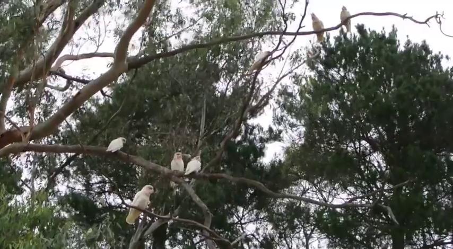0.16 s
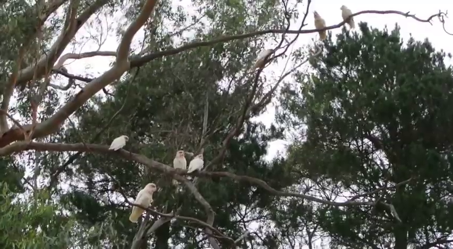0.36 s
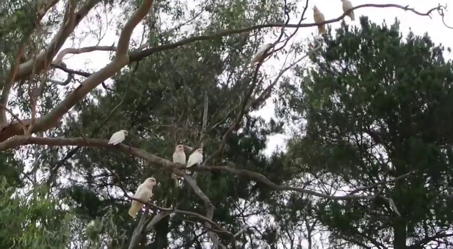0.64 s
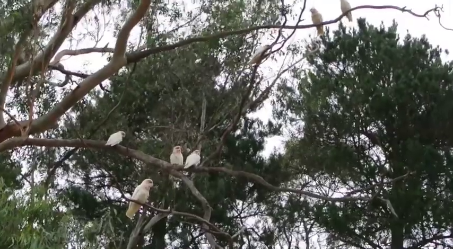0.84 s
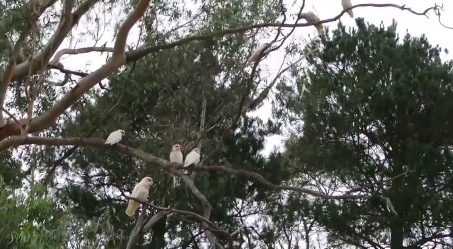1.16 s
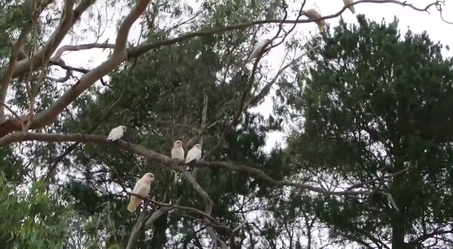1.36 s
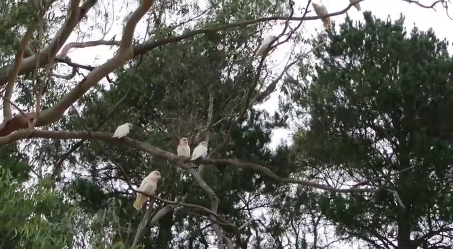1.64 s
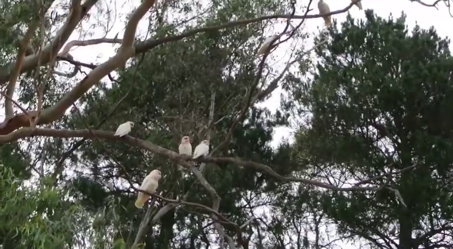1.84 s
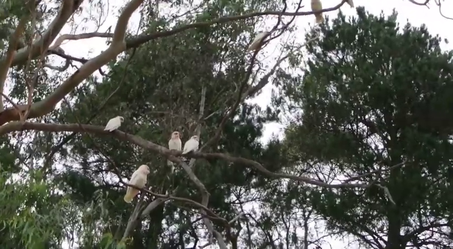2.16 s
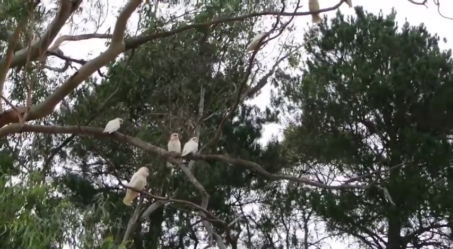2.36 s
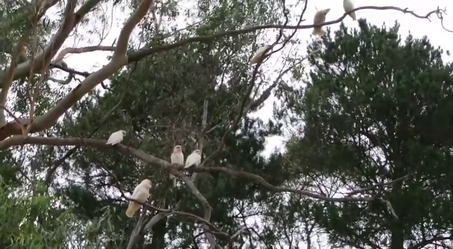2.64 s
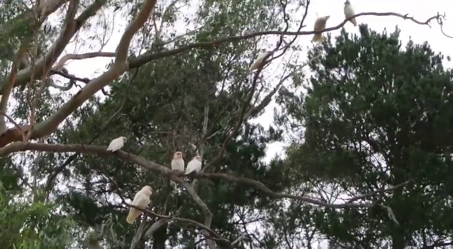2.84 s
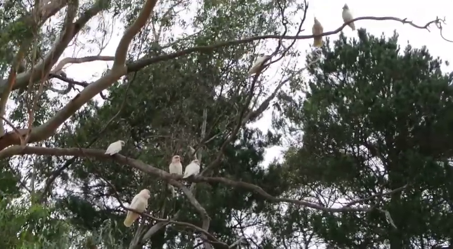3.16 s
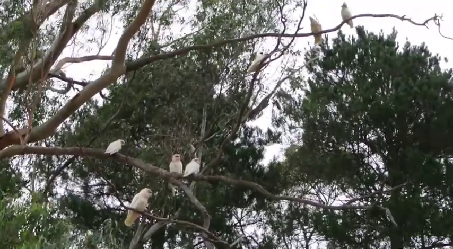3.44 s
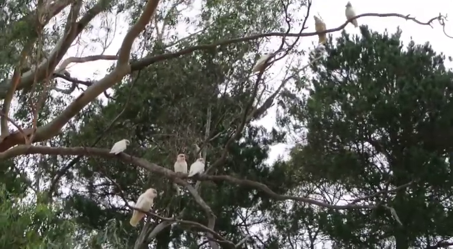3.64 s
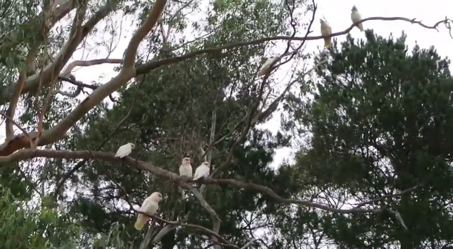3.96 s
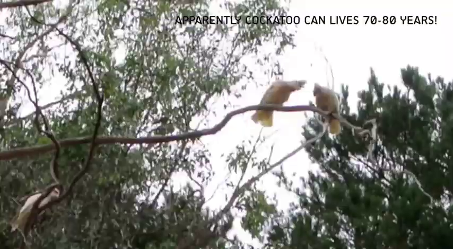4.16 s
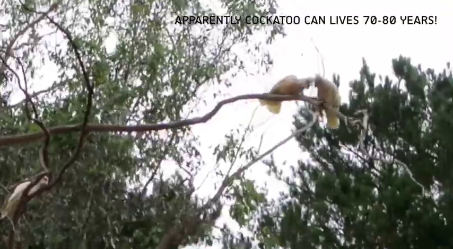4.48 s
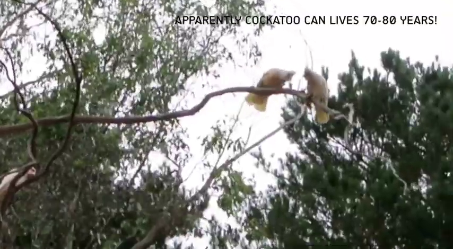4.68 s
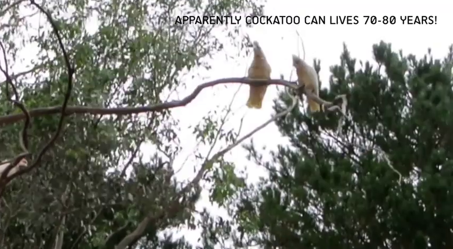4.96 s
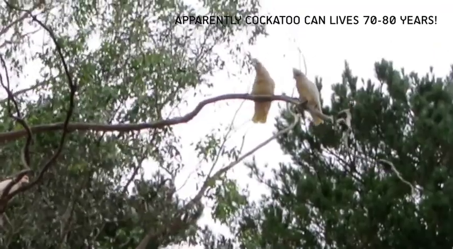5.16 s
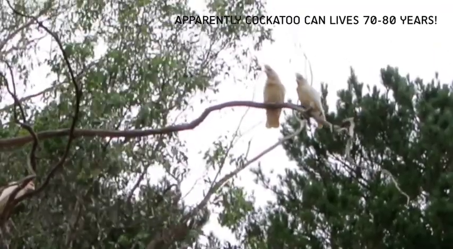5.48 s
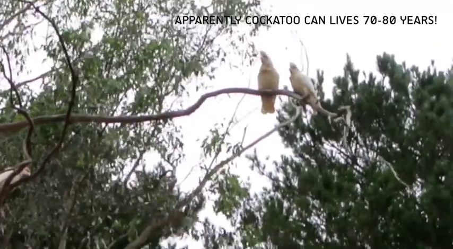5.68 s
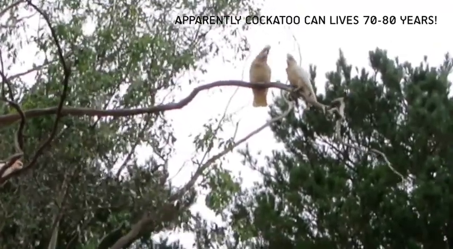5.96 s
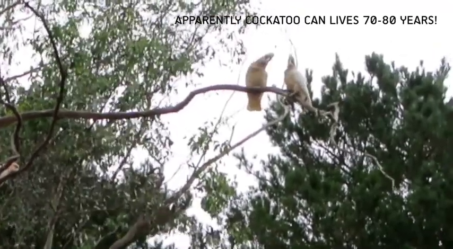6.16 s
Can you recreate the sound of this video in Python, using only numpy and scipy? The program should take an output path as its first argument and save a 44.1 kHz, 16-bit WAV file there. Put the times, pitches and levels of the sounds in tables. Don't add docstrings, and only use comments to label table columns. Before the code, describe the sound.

Distant cockatoos chatter in short yelps under buffeting wind, then abruptly nearby birds yelp and screech loudly and harshly among trees.

```python
import sys
import numpy as np
from scipy import signal
from scipy.fft import rfft, irfft
from scipy.io import wavfile
from scipy.ndimage import map_coordinates

SR = 44100
rng = np.random.default_rng(int(sys.argv[2]) if len(sys.argv) > 2 else 0)


def bounce(signal):
    frames = np.transpose(np.atleast_2d(signal))
    limited = np.clip(frames, -1, 1)
    pcm = np.round(limited * 32767).astype(np.int16)
    wavfile.write(sys.argv[1], SR, pcm)


def ratio(d):
    e = np.asarray(d, float) / 20
    return 10 ** e


N = 278712
TIME_S = np.arange(N) / SR


def rms_one(x):
    return x / np.sqrt(np.mean(x ** 2) + 1e-20)


def in_time(rows):
    times, *columns = np.transpose(rows)
    return [np.interp(TIME_S, times, column) for column in columns]


def at_hz(points, hz):
    point_hz, point_db = np.transpose(points)
    return np.interp(np.log(hz), np.log(point_hz), point_db)


def drift(rate_hz, size):
    r = np.exp(-2 * np.pi * rate_hz / SR)
    settling = 9000
    noise = rng.standard_normal(size + settling)
    return rms_one(signal.lfilter([1], [1, -2 * r, r * r], noise)[settling:])


def coloured(points):
    hz = np.maximum(np.arange(N // 2 + 1) * SR / N, 1)
    spectrum = rfft(rng.standard_normal((2, N))) * ratio(at_hz(points, hz))
    return rms_one(irfft(spectrum, N))


def resonance(x, hz, width_hz):
    r = np.exp(-np.pi * width_hz / SR)
    zeros = np.array([1, 0, -1]) * (1 - r * r) / 2
    return signal.lfilter(zeros, [1, -2 * r * np.cos(2 * np.pi * hz / SR), r * r], x)


# mode_hz, width_hz, level_db
THROAT_MODES = [(666, 220, -20), (1250, 750, -13.5), (2350, 510, -0.5)]
GAPE_MODES = [(3400, 700, 2.5), (5050, 830, -3.5)]
EDGE_MODES = [(6080, 1560, -0.5), (8740, 2340, -1.5), (11300, 3500, -4)]
ACCENTS_PER_S, ACCENT_DB = 210, 9


def ring(source, modes):
    total = 0
    for k, (hz, width_hz, level_db) in enumerate(modes):
        total = total + ratio(level_db) / np.sqrt(width_hz) * (-1) ** k * resonance(source, hz, width_hz)
    return rms_one(total)


def rasp(level_db, bright_db, gape_db, pulse_hz, jitter, spread_db, breath):
    phase = np.cumsum(pulse_hz * (1 + jitter * drift(500, size=N))) / SR
    fires = np.diff(np.floor(phase), prepend=0)
    even_power = np.sqrt(SR / pulse_hz)
    sizes = ratio(spread_db * rng.standard_normal(N).clip(-2, 2.4)) * even_power

    group = np.floor(np.cumsum((fires > 0) * ACCENTS_PER_S / pulse_hz) + .25 * drift(60, size=N))
    fire_at = np.flatnonzero(fires)
    accent = np.zeros(N, bool)
    accent[fire_at[1:][np.diff(group[fire_at]) > 0]] = True
    sizes = np.where(accent & (pulse_hz > 900), ratio(ACCENT_DB) * even_power, sizes)

    late = np.clip((phase % 1) * SR / pulse_hz, 0, 1)
    fired = fires * sizes
    pulses = fired * (1 - late) + np.roll(fired * late, -1)

    puffs = 1 + 0.76 * np.cos(2 * np.pi * phase)
    source = pulses + breath * puffs * rng.standard_normal(N)
    source = source / np.sqrt(1 + 0.78 * breath ** 2)
    low, high, edge = [ring(source, modes) for modes in (THROAT_MODES, GAPE_MODES, EDGE_MODES)]
    share = np.clip(ratio(gape_db + 1.5), 0, .95)
    voice = np.sqrt(1 - share ** 2) * low - share * high
    return ratio(level_db) * (voice + ratio(bright_db) * edge)


DULLING = 0.58


def outbursts(rows, attack_s, release_db_per_s):
    start, length, level_db, fade_db, bright_db = np.transpose(rows)[:, :, None]
    since = TIME_S - start
    release_db = release_db_per_s * np.maximum(since - length, 0)
    slack_db = release_db - 8.1 * np.log10(np.clip(since / attack_s, 1e-6, 1))
    db = level_db - fade_db * np.clip(since / length, 0, 1) - slack_db
    loudest = np.argmax(db, axis=0)
    slack_db = np.minimum(slack_db[loudest, np.arange(N)], 40)
    return db.max(axis=0), bright_db[loudest, 0] - DULLING * slack_db


# start_s, length_s, level_db, fade_over_length_db, brightness_db
NEAR_SCREECHES = [(3.8, 0.19, -17.5, 12, -8), (3.925, .25, -15, 5.5, -6.5), (4.2, 0.04, -25, 1, -7.5),
                  (4.315, .2, -18, 0, -6.5), (4.675, 0.044, -27, -2.5, -9), (4.81, 0.21, -36, -4, -21),
                  (5.18, 0.09, -21.5, -2, -7), (5.23, .09, -28, -4, -4), (5.285, .335, -23, 1, -6.5),
                  (5.71, 0.33, -21.5, -1.5, -13.5), (6.19, 0.079, -44, 0, 3)]
# time_s, rate_hz, chaos (0-1.1)
THROAT_PULSING = [(3.81, 1200, .45), (3.88, 1050, .7), (3.95, 1080, .6), (4.09, 1200, 1.05),
                  (4.19, 1190, 1.0), (4.25, 1000, .8), (4.33, 1120, .7), (4.43, 1200, 1.1),
                  (4.51, 1200, 1.1), (4.6, 980, 1.0), (4.7, 1080, .9), (5.18, 1050, .9), (5.19, 686, .9),
                  (5.27, 686, .9), (5.29, 343, .2), (5.325, 343, .3), (5.34, 686, .8), (5.7, 686, .9),
                  (5.76, 660, .65), (6.32, 800, .8)]


def near_screeches():
    level_db, bright_db = outbursts(NEAR_SCREECHES, attack_s=0.055, release_db_per_s=240)
    pulse_hz, chaos = in_time(THROAT_PULSING)
    gape_db = -3.5 + 0.17 * (level_db + 20)
    return rasp(level_db - 1.5, bright_db, gape_db, pulse_hz, jitter=.07 * chaos, spread_db=3.5,
                breath=1.5 * chaos)


# start_s, length_s, level_db, fade_over_length_db, brightness_db
FLOCK_OUTBURSTS = [(-.03, 0.34, -55, -5.5, -6.5), (.45, 0.13, -63, -16, -8), (.72, 0.25, -48.5, 1.5, -12),
                   (1.06, 0.22, -44, 4.5, -11), (1.385, 0.17, -43.5, -7.5, -7.5), (1.75, 0.18, -65, 3, -16),
                   (2.0, 0.64, -60, -20.5, -13), (2.65, 0.11, -40, 5, -34), (3.1, .2, -74, 0, -15),
                   (3.357, 0.048, -49, 8, 19.5), (3.43, 0.1, -47, -16, 3.5)]


def far_flock_rasp():
    level_db, bright_db = outbursts(FLOCK_OUTBURSTS, attack_s=0.028, release_db_per_s=201)
    return rasp(level_db, bright_db, gape_db=-4.5, pulse_hz=797.0, jitter=0.21, spread_db=3.0, breath=2.9)


# time_s, pitch_hz, level_db
LOW_SIDE = [
    [(3.93, 2286, -30), (4.0, 2294, -28), (4.06, 2450, -36), (4.15, 2514, -32), (4.2, 2346, -36),
     (4.235, 1802, -38), (4.26, 1704, -46)],
    [(4.32, 2205, -38.5), (4.37, 2280, -25.5), (4.41, 2498, -35), (4.46, 2400, -37), (4.51, 2506, -30),
     (4.57, 2237, -31.5), (4.62, 1700, -49)],
    [(5.2, 2347, -34), (5.222, 2340, -26), (5.4, 2430, -35.5), (5.572, 2384, -29.5), (5.58, 2330, -42),
     (5.62, 2327, -32)],
    [(5.77, 2750, -50), (5.774, 2679, -41), (5.796, 2562, -32), (5.828, 2657, -33.5), (6.028, 2613, -37),
     (6.06, 2535, -33)],
]
# time_s, pitch_hz, level_db
HIGH_SIDE = [
    [(3.93, 3150, -27), (3.97, 3350, -27), (4.05, 3250, -28), (4.12, 3350, -35), (4.22, 3150, -38),
     (4.26, 3100, -50)],
    [(4.32, 3250, -36), (4.36, 3280, -25.5), (4.44, 3450, -31), (4.52, 3420, -33.5), (4.56, 3350, -50),
     (4.62, 3300, -55)],
    [(5.2, 3495, -47), (5.216, 3370, -32), (5.282, 3424, -26.5), (5.536, 3416, -33), (5.572, 3371, -24),
     (5.62, 3423, -50)],
    [(5.77, 3230, -48), (5.792, 3207, -31), (5.82, 3279, -32), (5.828, 3333, -30), (5.954, 3291, -30),
     (6.06, 3299, -41)],
]
MIX_LINES = [
    [(.5, 0), (2, 0), (-1, 2), (1, 1), (2, -1)],
    [(.5, 0), (2, 0), (-1, 2), (1, 1), (2, -1), (1.5, 0)],
    [(2, -1), (-1, 2), (1, 1), (4, -1), (-1, 1), (3, -1), (-3, 3), (-2, 2), (2, 0), (5, -2)],
    [(-2, 2), (-1, 2), (1, 1), (2, -1), (-2, 3), (2, 0), (0, 1.5), (0, 2)],
]
MIX_LEVELS = [
    [-17.5, -25, -8, -21, -10.5],
    [-11, -6.5, -21, -17, -21, -23],
    [-18, -8, -12, -7.5, -24, -3.5, -10, -14, -13, -22],
    [-8, -8, -13, -15, -11, -20, -5, -9.5],
]
SIDE_WOBBLE = [.012, .008, .004, .004]


def two_voices(flutter_db=3.0):
    out = np.zeros(N)
    for low, high, lines, line_db, wobble in zip(LOW_SIDE, HIGH_SIDE, MIX_LINES, MIX_LEVELS, SIDE_WOBBLE):
        start, end = low[0][0], low[-1][0]
        t = start + np.arange(round((end - start) * SR)) / SR
        size = len(t)
        phases, levels = [], []
        for side, flutter_hz in ((low, 53), (high, 73)):
            times, pitch_hz, level_db = np.transpose(side)
            pitch = np.interp(t, times, pitch_hz) * (1 + wobble * drift(60, size))
            phases.append(2 * np.pi * np.cumsum(pitch) / SR)
            levels.append(np.interp(t, times, level_db) + flutter_db * drift(flutter_hz, size))
        a, b = phases
        low_db, high_db = levels
        call = ratio(low_db) * np.sin(a) + ratio(high_db) * np.sin(b)
        for (m, n), db in zip(lines, line_db):
            mix_db = (low_db + high_db) / 2 + db + flutter_db * drift(40, size)
            call += ratio(mix_db) * np.sin(m * a + n * b + rng.uniform(0, 2 * np.pi))
        ends = np.clip(np.minimum(t - t[0], t[-1] - t) / 0.0055, 0, 1)
        i = round(t[0] * SR)
        out[i:i + size] += np.sqrt(2) * call * ends
    return out


# partial_hz, level_db
DEEP_THROAT = [(500, -41), (800, -9.5), (1400, -1), (2150, -4.5), (2900, -10), (3650, -4), (4400, -8),
               (5800, -8), (8000, -23), (11000, -21), (15000, -69)]
MIDDLE_BIRD_THROAT = [(600, -27), (900, -19), (1700, -5), (2600, -8), (3500, -10.5), (5300, -14.5),
                      (8000, -28), (15000, -41)]
SHRILL_BIRD_THROAT = [(900, -4), (1200, -2.5), (2200, 5), (3400, -9), (4600, -4.5), (7000, -14),
                      (14000, -49)]
# start_s, length_s, middle_pitch_hz, glide_hz, level_db
CLOSE_YELPS = [(3.345, 0.037, 833, -190, -20), (3.383, 0.026, 1114, -61, -23.5),
               (3.412, 0.03, 751, 99, -23), (3.458, 0.066, 732, -39, -20), (3.51, .042, 1010, 90, -23),
               (3.53, 0.045, 710, 110, -18), (3.62, 0.036, 913, -78, -28), (3.649, 0.066, 877, 57.5, -17),
               (3.722, 0.032, 528, 40, -34.5), (3.754, 0.034, 829, 107, -19),
               (3.806, 0.07, 1096, -192, -25.5), (4.173, 0.079, 1017, -200, -35.5),
               (3.74, .025, 647, 213, -33), (3.674, 0.046, 1005, 71, -31), (6.292, .04, 890, 148, -42),
               (5.588, 0.05, 860, 25, -40.5), (6.2, 0.028, 790, 70, -29.5), (6.232, 0.062, 835, 90, -28)]
FLOCK_YELPS = [(0.209, 0.042, 643, 101, -42.5), (0.258, 0.051, 692, 156, -38.5),
               (0.331, 0.042, 693, -170, -49), (0.796, 0.066, 727, 64, -38.5),
               (0.856, 0.074, 690, 190, -41), (1.083, 0.059, 722, -63, -38.5),
               (1.126, 0.062, 727, 58, -40), (1.198, 0.044, 584, 20, -44), (1.39, 0.039, 756, 94, -37),
               (1.519, 0.057, 691, -150, -33.5), (1.53, 0.044, 1270, -300, -50),
               (1.5, 0.069, 1060, -200, -46), (1.851, 0.077, 582, -15, -40),
               (1.995, 0.084, 775, 72.5, -43), (2.067, 0.038, 725, 59, -35),
               (2.187, 0.043, 696, 95, -37.5), (2.237, 0.066, 732, 43, -37),
               (2.306, 0.029, 624, -25, -42), (2.357, 0.032, 676, 22, -44.5),
               (2.542, 0.063, 749, 67, -35.5), (2.606, 0.051, 705, 128, -33.5),
               (3.255, 0.07, 577, -5, -46.5),
               (0.67, 0.061, 875, -48, -51), (0.771, 0.028, 800, -88, -41.5),
                    (1.024, 0.042, 900, -24, -50), (1.331, 0.071, 934, 11, -44.5),
                    (1.427, 0.115, 905, -59.5, -37.5), (1.396, 0.054, 1080, 205, -40),
                    (1.675, 0.033, 864, -45, -68), (1.745, 0.098, 880, 26, -46),
                    (1.897, 0.055, 814, -4, -44), (1.936, 0.061, 853, 42, -43),
                    (2.09, 0.068, 848, -96, -40), (2.442, 0.071, 829, 201, -38.5),
                    (2.685, 0.09, 864, -36, -49), (2.76, 0.063, 838, -60, -46),
                    (3.089, 0.081, 865, -78, -58.5), (3.191, 0.059, 802, -18, -56.5),
                    (3.273, 0.022, 814, 0, -51)]
# start_s, length_s, middle_pitch_hz, glide_hz,
# level_db
LEVEL_CRIES = [(4.3, .03, 1290, 40, -59), (4.87, 0.084, 1070, -170, -31), (4.845, 0.058, 1058, -42, -42),
               (4.887, 0.063, 720, -48, -37.5), (4.962, 0.069, 1020, 4, -31.5),
               (4.996, .04, 920, -200, -34), (4.931, 0.043, 940, 115, -46), (5.012, 0.09, 800, -130, -35),
               (5.204, 0.07, 2350, 2, -26), (5.925, .14, 2140, 56, -29), (7.1, .13, 2120, 40, -31.5),
               (5.75, 0.032, 2180, 58, -31), (5.625, .035, 900, -62, -37)]
ARCH_HZ_PER_S, SHRILL_ARCH_HZ_PER_S = 1500, 530
SWELL, FALL = 3.6, .34


def yelps(rows, wobble=.005, effort_tilt=1.6, breath_db=-10, patchy_db=2.4):
    out = np.zeros(N + SR)
    order = np.arange(1, 19)[:, None]
    for start, length, middle, glide, level_db in rows:
        u = np.linspace(-1.2, 1.2, round(1.2 * length * SR))
        arch = length * (SHRILL_ARCH_HZ_PER_S if middle > 1000 else ARCH_HZ_PER_S)
        if LEVEL_CRIES[0][0] <= start <= LEVEL_CRIES[-1][0]:
            arch = 0
        pitch = middle + glide / 2 * u - arch * u * u
        pitch = pitch * (1 + wobble * drift(65, size=len(u)))
        effort = np.clip(1 - (u / 1.2) ** 4, 0, 1)
        sag = FALL * (1 if arch else .25)
        pitch = pitch * (1 - sag * (1 - effort) * (u > 0))
        effort = np.where(u < 0, 1 - (np.abs(u) / 1.2) ** SWELL, effort).clip(0, 1)

        if middle > 1000:
            throat = SHRILL_BIRD_THROAT
        elif middle > 790:
            throat = MIDDLE_BIRD_THROAT
        else:
            throat = DEEP_THROAT
        gains = ratio(at_hz(throat, order * pitch)) * (order * pitch < 15500)
        power = np.sum(gains ** 2, axis=0) / 2
        gains = gains * effort ** (0.35 + effort_tilt * order / 4) / np.sqrt(power)
        patches = drift(17.4, size=gains.size).reshape(gains.shape)
        gains = gains * ratio(patchy_db * np.clip(order / 4, 0, 1.5) * patches)

        phase = 2 * np.pi * order * np.cumsum(pitch) / SR + rng.uniform(0, 2 * np.pi, order.shape)
        stack = np.sum(gains * np.sin(phase), axis=0)
        hoarse = 1 + ratio(breath_db) * drift(700, size=len(u))
        i = max(round((start - .1 * length) * SR), 0)
        out[i:i + len(u)] += ratio(level_db - 0.31 * u ** 2) * hoarse * stack
    return out[:N]


# from_s, to_s, level_db
CHATTER_SPELLS = [
    (0, 1.3, -52.5),
    (1.801, 2.82, -46.5),
    (3.377, 3.8, -39),
    (4.801, 5.15, -42.5),
]
CHATTER_PER_S = 16


def chatter():
    rows = []
    for start, end, level_db in CHATTER_SPELLS:
        for k, (when, length, pitch, slant, level) in enumerate(rng.random((40, 5))):
            if start + (k + 1) / CHATTER_PER_S < end:
                rows.append((start + (k + when) / CHATTER_PER_S, .03 + .05 * length, 560 + 480 * pitch,
                             300 * (slant - .5), level_db + 8 * (level - .5)))
    return yelps(rows)


def buffet_click():
    since = TIME_S - 2.896
    return ratio(-41) * rng.standard_normal(N) * (since > 0) * np.exp(-np.abs(since) / 0.001)


def placed(x, lag, pan_db):
    left = map_coordinates(x, [np.arange(N) - lag], order=3)
    return np.array([left * ratio(pan_db / 2), x * ratio(-pan_db / 2)])


def trees(x, t60_s=0.17, level_db=-10.5):
    t = np.arange(round(.4 * SR)) / SR
    tail = signal.lfilter([1], [1, -.55], rng.standard_normal((2, len(t))))
    tail = tail * ratio(-60 * t / t60_s) * np.minimum(t / 0.008, 1)
    tail /= np.sqrt(np.sum(tail ** 2, axis=1, keepdims=True))
    return ratio(level_db) * signal.fftconvolve(x[None], tail, axes=1)[:, :N]


# time_s, level_db, left_minus_right_db
GUSTS = [(0.0, -36.5, 1), (0.11, -31.5, -16), (0.16, -32, -3.5), (1.14, -32.5, -4.5), (1.31, -41.5, 8),
         (1.42, -37, -11), (1.98, -33.5, 7.5), (2.11, -42, 7.5), (2.18, -31.5, -11.5), (2.54, -39.5, -1),
         (2.78, -30, -6.0), (3.21, -41, -11.5), (3.48, -32, 4), (4.02, -35.5, -12.5), (4.06, -36.5, 19),
         (4.15, -36, -25), (4.19, -35, 4.5), (4.25, -64, -3.0)]
# frequency_hz, level_db (per Hz)
RUMBLE_COLOUR = [(12, -50), (20, -16), (129, -2), (202, 0), (358, -3.5), (517, -8), (711, -16),
                 (787, -17.5), (1100, -31), (1430, -26), (2420, -120)]
# time_s, peak_db
BUFFETS = [(0.073, -14.5), (0.117, -28), (0.181, -16.5), (0.276, -25), (0.347, -20), (0.364, -18),
           (0.442, -31), (0.585, -32), (0.628, -23.5), (1.671, -29), (1.71, -22), (1.736, -34),
           (1.935, -26), (1.997, -28), (2.15, -25), (2.287, -27), (2.368, -20.5), (2.664, -21.5),
           (2.795, -20), (2.863, -23), (2.894, -14.5), (2.917, -21.5), (3.03, -27), (3.084, -30.5),
           (3.193, -29), (3.288, -16), (3.436, -15), (3.873, -19.5), (4.113, -21.5)]
CALM_S = 4.18


def wind(lumpy_db=4.0, eddies_per_s=260, eddy_db=4.0, pop_hz=480, pop_width_hz=420):
    level_db, pan_db = in_time(GUSTS)
    gain = ratio(level_db + 4.5 + np.array([[.5], [-.5]]) * pan_db)
    gain = gain * np.clip((CALM_S - TIME_S) / 0.016, 0, 1)
    lumps = ratio(lumpy_db * np.array([drift(45, size=N), drift(35.5, size=N)]))
    eddies = (rng.random((2, N)) < eddies_per_s / SR) * ratio(eddy_db * rng.exponential(1, (2, N)).clip(0, 4))
    eddies = eddies * rng.choice([-1, 1], (2, N))
    kicks = ratio(-11.0) * rms_one(eddies) * gain * lumps
    for start, peak_db in BUFFETS:
        gaps = np.r_[0, rng.uniform(.002, .005, 3) * SR]
        at = round(start * SR) + np.cumsum(gaps).astype(int)
        kicks[1, at] += ratio(peak_db + 37.5 - 5.1 * np.arange(4)) * rng.choice([-1, 1], size=4)
    soft = signal.sosfilt(signal.butter(3, 1150, fs=SR, output="sos"), kicks + 1e-18)
    rumble = rms_one(coloured(RUMBLE_COLOUR) * lumps) * gain
    rumble = signal.sosfilt(signal.butter(2, 40, "high", fs=SR, output="sos"), rumble)
    return rumble + np.array([resonance(port, pop_hz, pop_width_hz) for port in soft])


# frequency_hz, level_db (per Hz)
AIR_COLOUR = [(20, -11), (92, -4.5), (217, -6.5), (278, -12), (387, -10), (433, -13.5), (889, -4),
              (1310, -5), (2340, -2.5), (8000, -19), (16000, -32)]
# time_s, level_db
AIR_SWELLS = [
    (0, -50.5),
    (2.8, -44),
    (2.95, -56.5),
    (3.35, -51.5),
    (3.37, -30.5),
    (4.2, -37.5),
    (6.32, -34),
]


def air():
    return ratio(in_time(AIR_SWELLS)[0]) * coloured(AIR_COLOUR)


# time_s, left_lag_samples, left_minus_right_db
BIRD_PLACES = [(0, 1, -1), (.72, 1, -1), (.79, -4, 0), (.9, 1, -1), (1.33, 1, -1), (1.38, -5.5, 4),
               (1.58, -5, 4), (1.7, 0, -2), (2.05, 1, -1), (2.07, 6, -4), (2.14, 5, -4), (2.18, 1, -1),
               (2.4, 1, -1), (2.44, 4, -4), (2.51, 4, -4), (2.54, .5, -1.5), (3.4, 0, -1), (3.9, 1.5, -3),
               (4.1, 1, -1), (4.77, 0, -1), (4.82, -4, 3), (5.13, -4, 2), (5.19, 4.6, -5), (6.1, 5, -5),
               (6.18, -5, 4)]


def scene():
    birds = np.where(TIME_S >= 3.808, near_screeches(), far_flock_rasp())
    birds = birds + two_voices() + buffet_click()
    birds += yelps(FLOCK_YELPS + LEVEL_CRIES)
    view_change = round(3.359 * SR)
    close = yelps(CLOSE_YELPS)
    close[:view_change] = 0
    birds += close
    unseen = chatter()
    lag, pan_db = in_time(BIRD_PLACES)
    both_sides = -5 * np.sign(drift(4, size=N))
    direct = placed(birds, lag, pan_db) + placed(unseen, both_sides, 0)
    return direct + trees(birds + unseen) + wind() + air()


def band_limit(x):
    return signal.sosfilt(signal.butter(12, 15820, fs=SR, output="sos"), x)


def record(dry):
    mix = signal.sosfilt(signal.cheby2(14, 60, 16150, fs=SR, output="sos"), dry)
    return band_limit(mix)


dry = scene()
out = record(dry)
bounce(out)
```